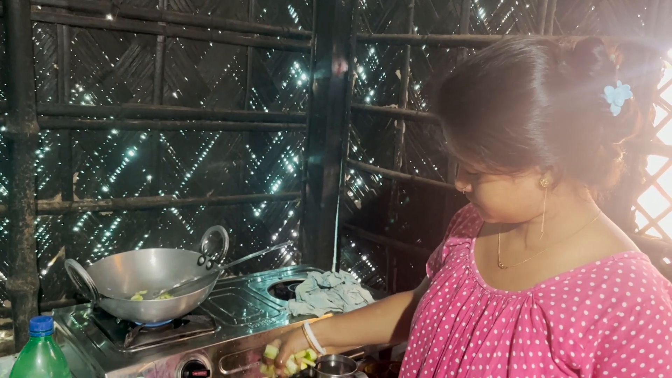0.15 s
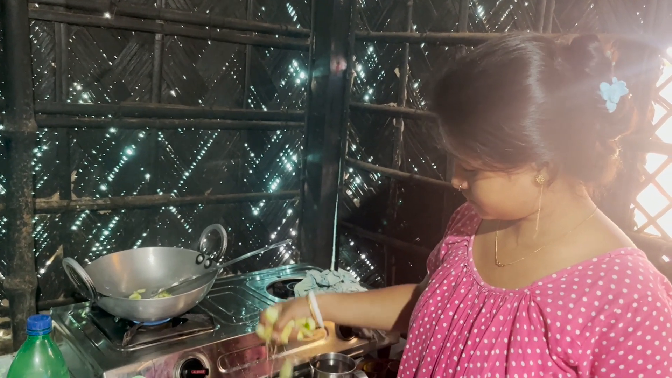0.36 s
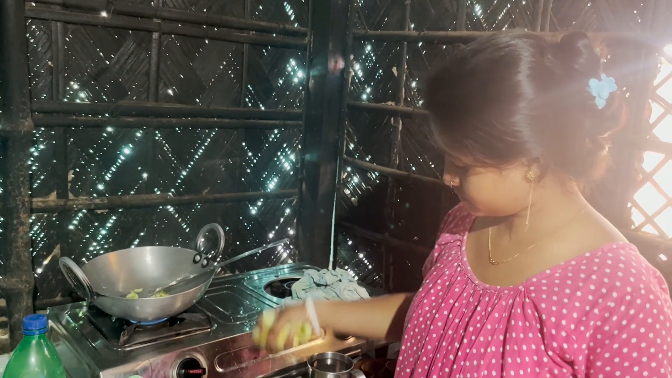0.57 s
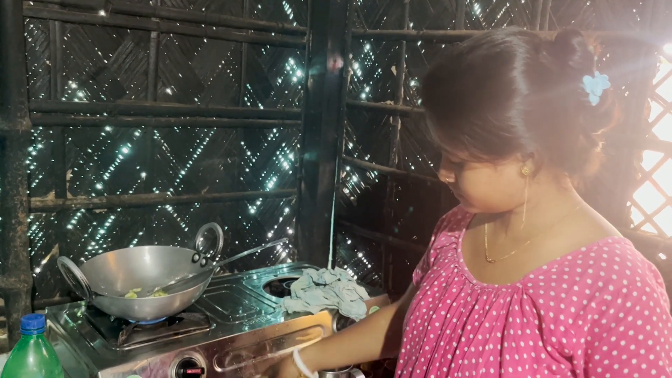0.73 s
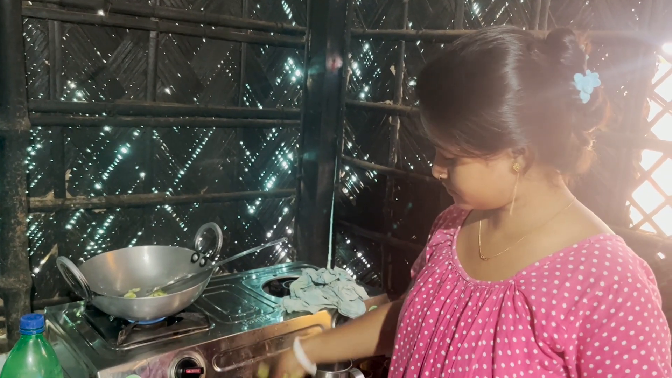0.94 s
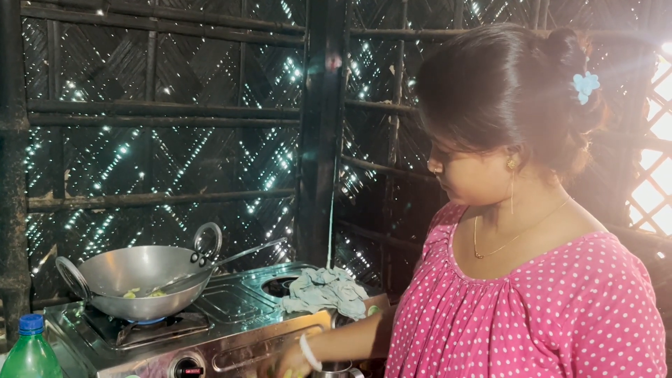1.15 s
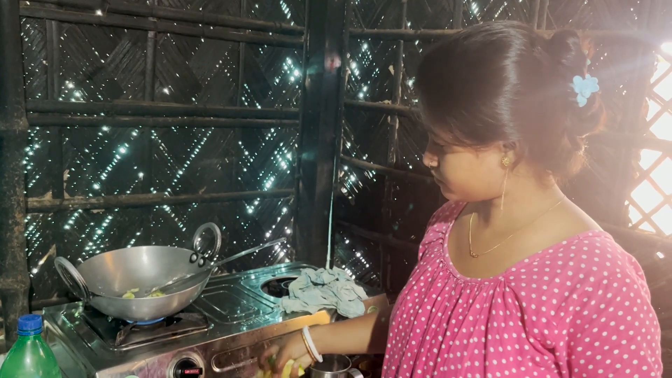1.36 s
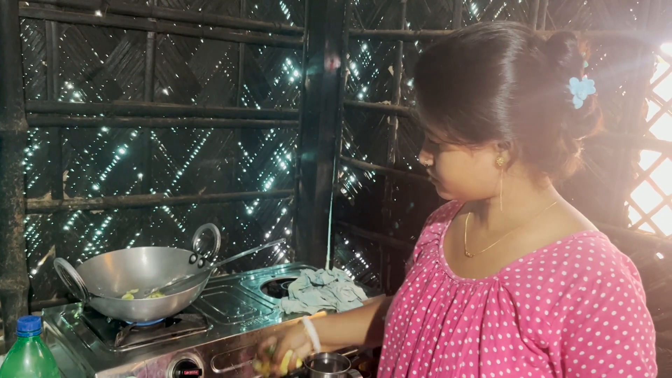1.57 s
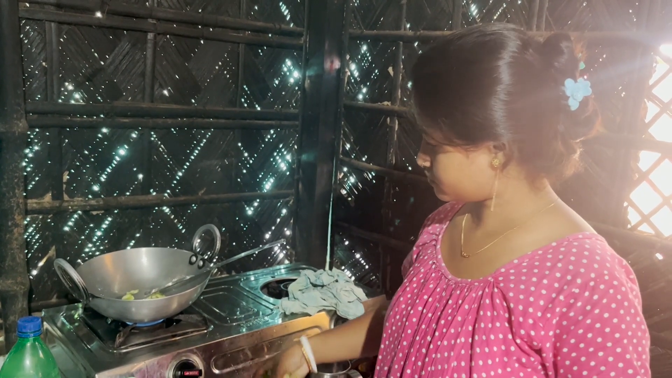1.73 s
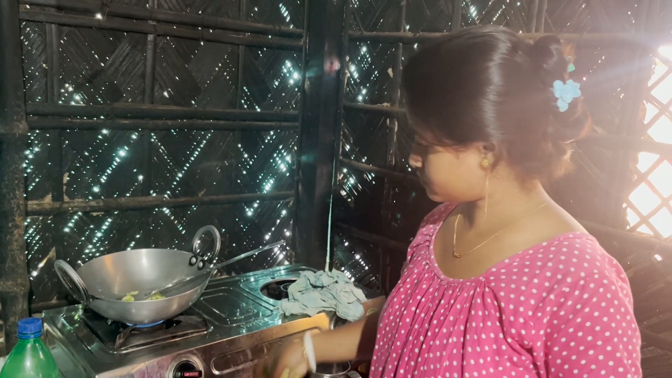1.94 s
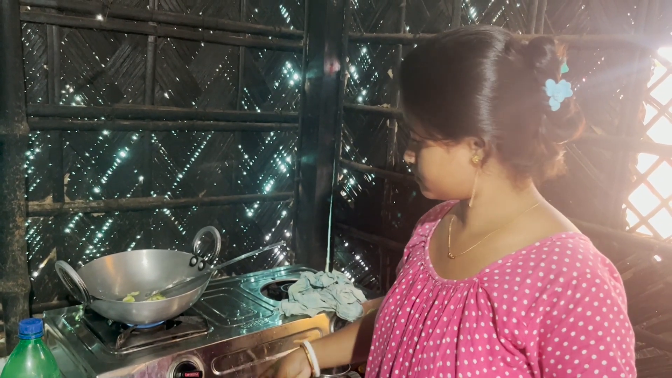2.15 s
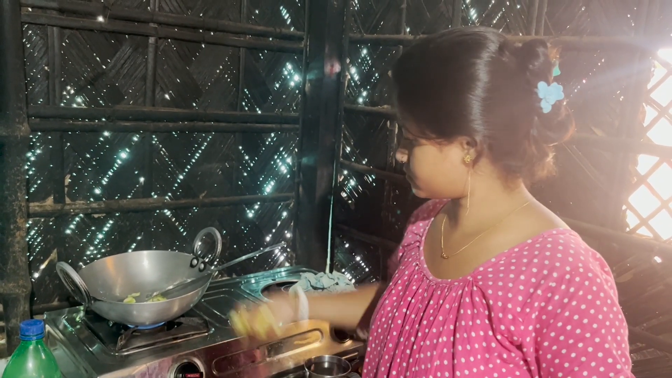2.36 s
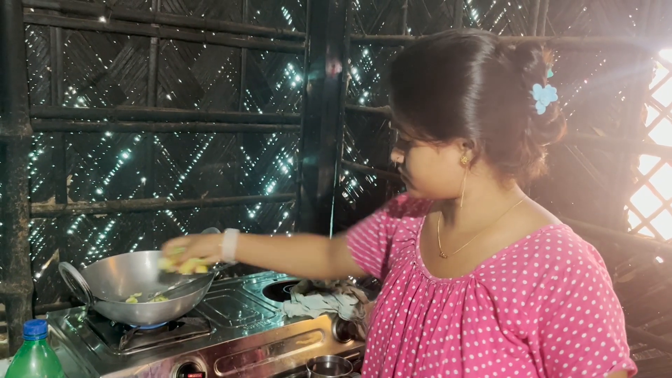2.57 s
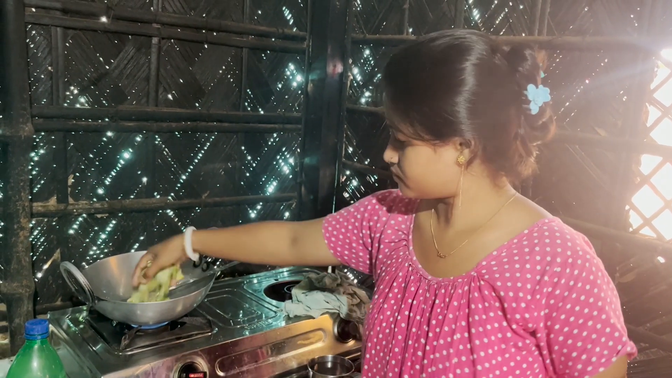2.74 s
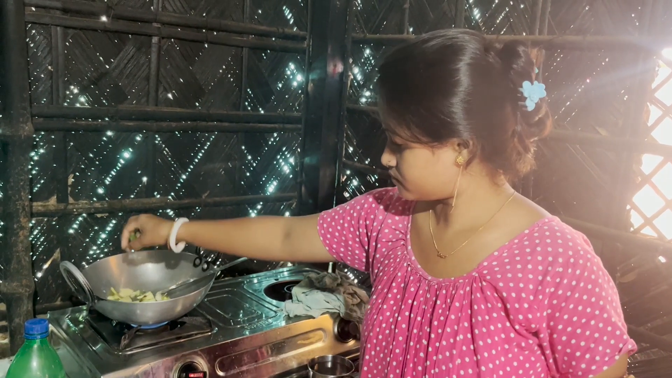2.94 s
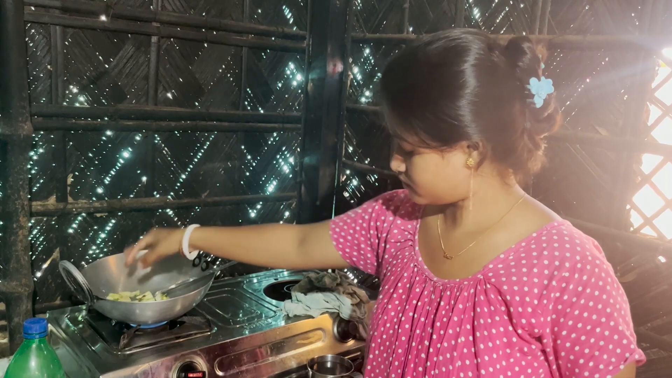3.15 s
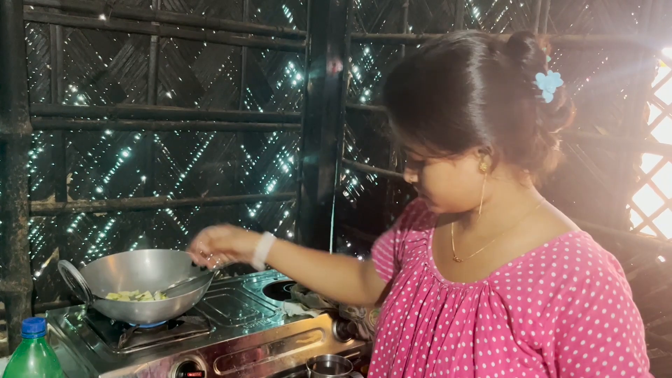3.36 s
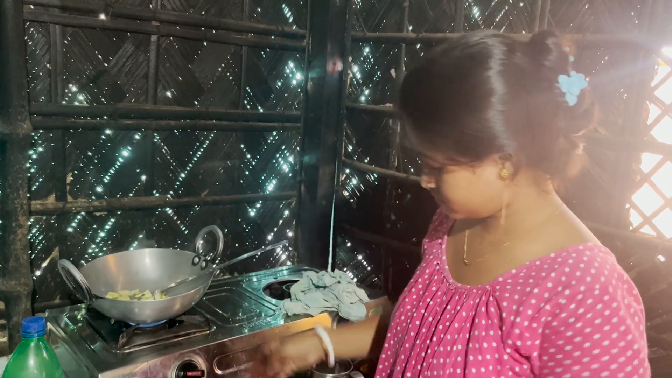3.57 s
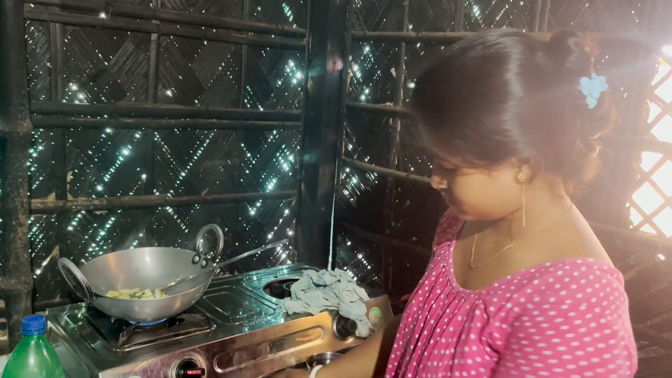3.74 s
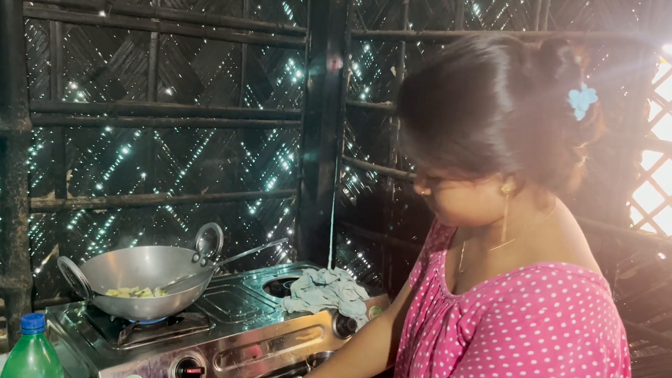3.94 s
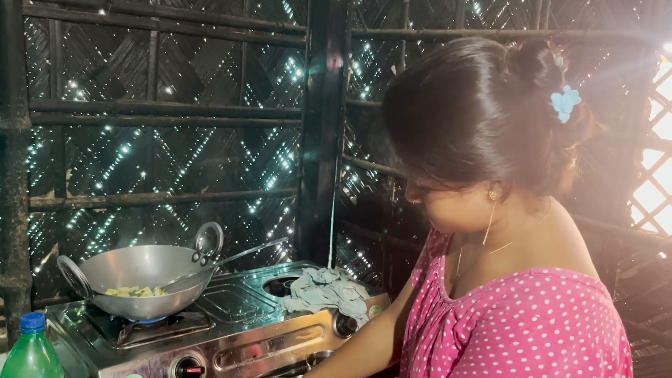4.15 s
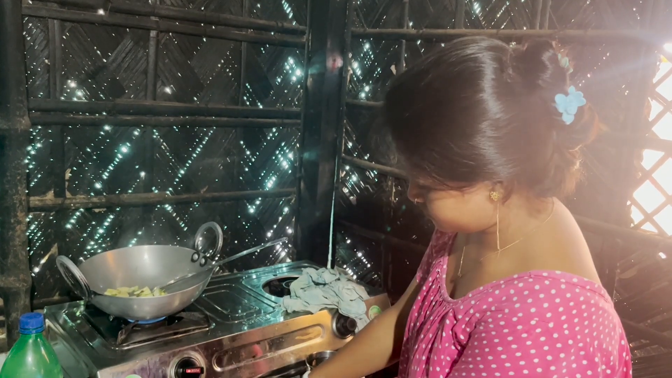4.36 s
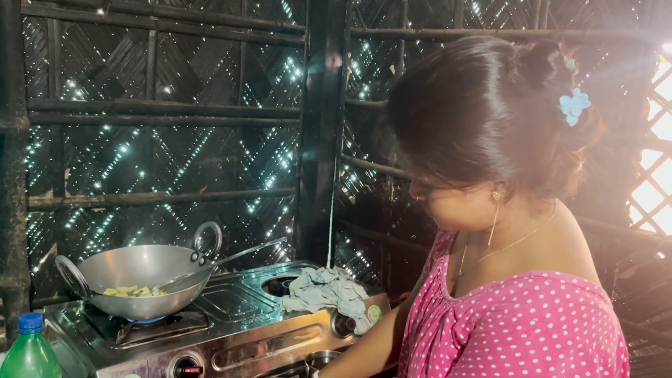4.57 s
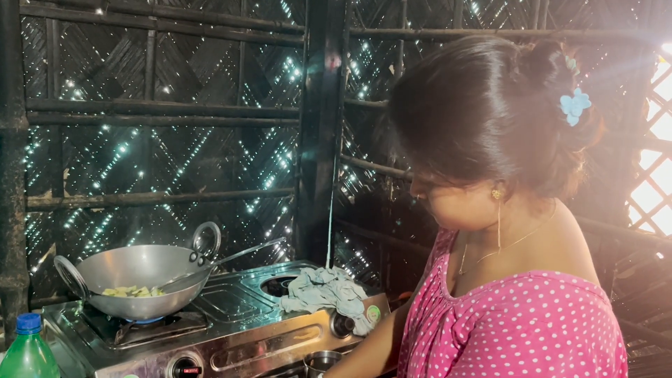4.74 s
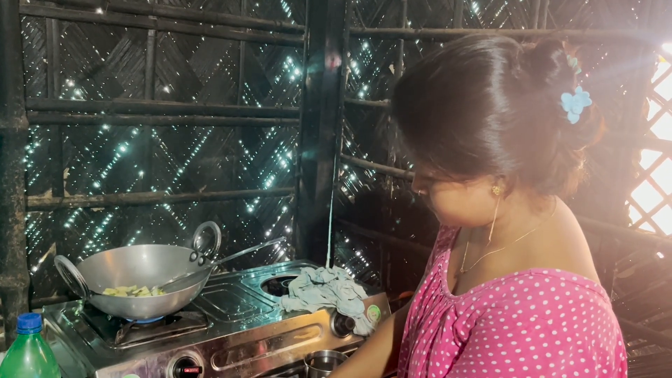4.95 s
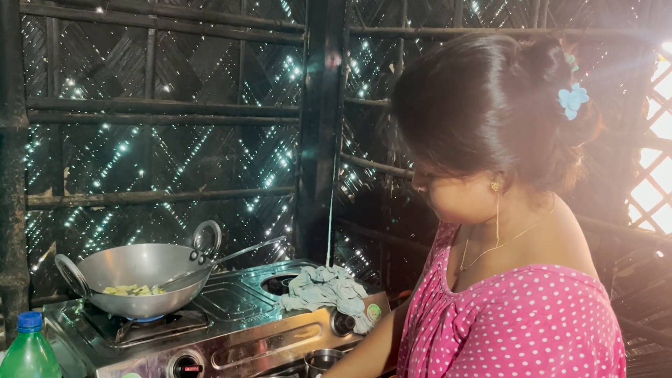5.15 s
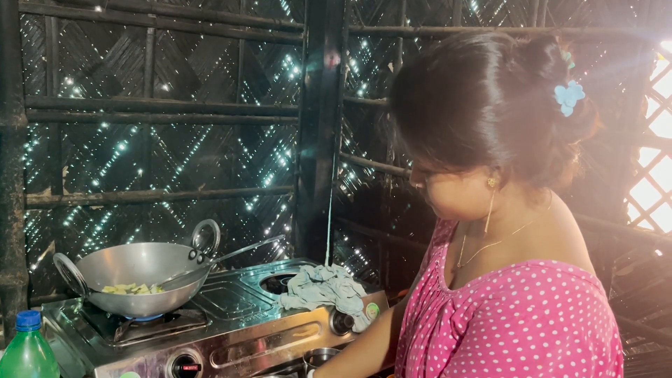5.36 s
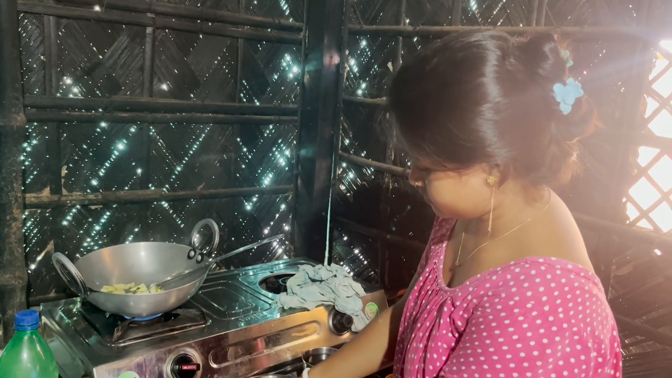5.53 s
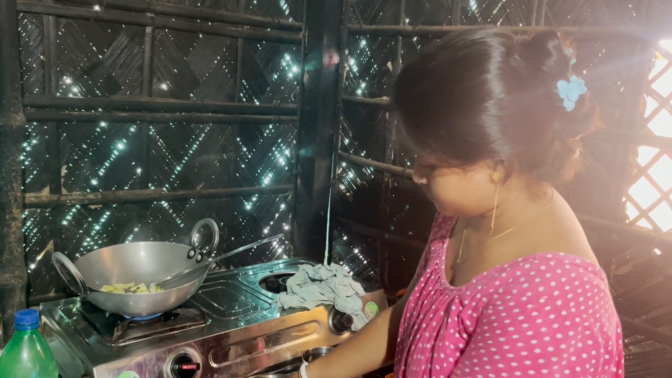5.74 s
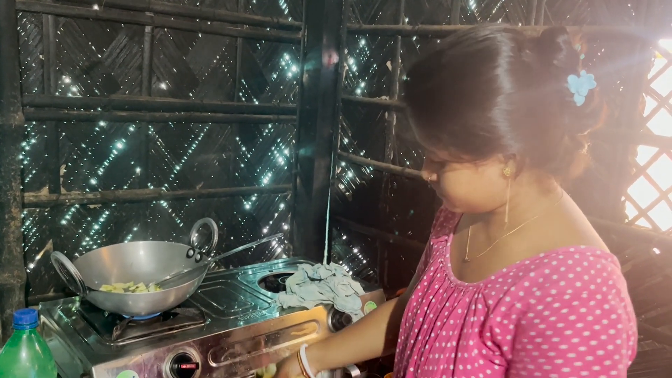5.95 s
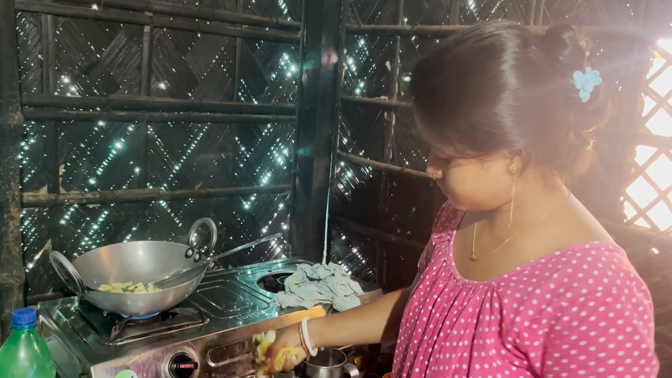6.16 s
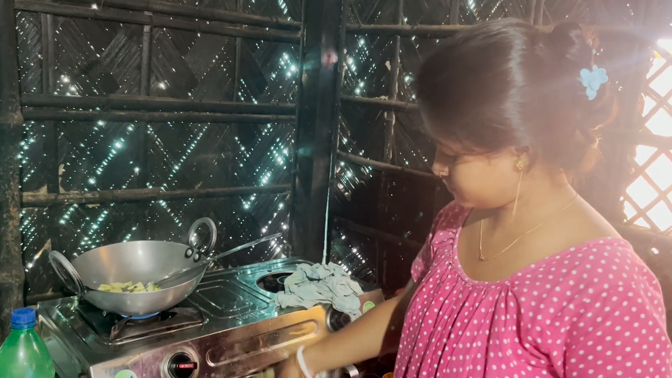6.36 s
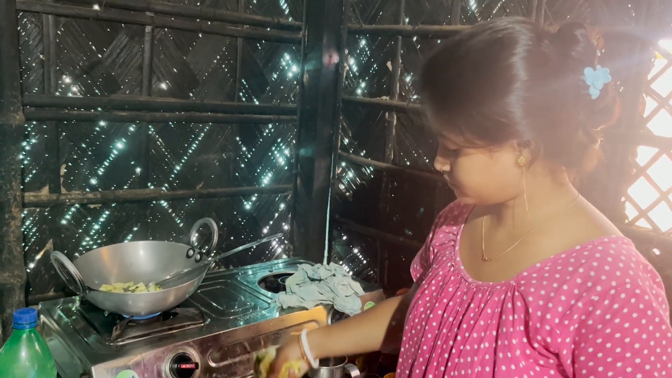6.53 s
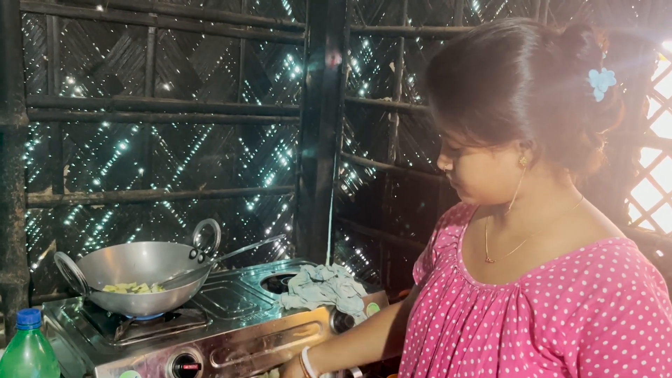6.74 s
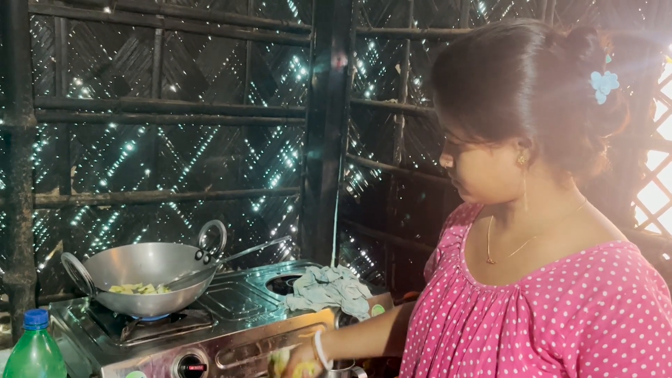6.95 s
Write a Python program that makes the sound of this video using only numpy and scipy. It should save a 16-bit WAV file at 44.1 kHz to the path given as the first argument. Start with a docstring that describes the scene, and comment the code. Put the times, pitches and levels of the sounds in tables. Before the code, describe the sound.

Wet vegetables sizzle and spit in a steel wok over gas; a fresh handful drops in and the frying surges louder.

```python
"""A steel wok sputters on a rumbling gas flame: tiny steam bubbles fizz, larger ones crackle and ring.
Pockets of water flash to steam in short spits from the start; faint far tones and low swells come and go.
At about 2.8 s a wet handful of vegetables drops in and slaps the steel; the sizzle surges, then settles.
From 3.5 s big bubbles well up, and a hard tick follows near 6.6 s. Noise, pops and decaying sines make
the sources; filters and echoes shape them for the two microphone ports of a phone at the side."""
import sys
import numpy as np
from scipy import signal
from scipy.fft import rfft, irfft
from scipy.io import wavfile

SR = 44100
rng = np.random.default_rng(int(sys.argv[2]) if len(sys.argv) > 2 else 0)


def wav_out(sig):
    """Save sig, one row per channel (or a flat mono array), as 16-bit PCM at SR to the path in sys.argv[1]."""
    wavfile.write(sys.argv[1], SR, np.round(np.clip(np.atleast_2d(sig).T, -1, 1) * 32767).astype(np.int16))


N = 313110
TIME = np.arange(N) / SR
FREQ = np.maximum(np.arange(N // 2 + 1) * SR / N, 1)
# time the oil takes to recover from the handful (s, exponential)
RECOVERY_S = 53
# pockets of water flashing to steam, before filtering:
# [t/s, fizz level/dB, crackle level/dB, decay/s]
WATER_SPITS = [(0.058, -13.5, -35, .025), (0.197, -16, -20, .012), (0.310, -28, -21.5, .03),
               (0.349, -12, -24.5, .02), (0.398, -12, -22, .012), (0.517, -13.5, -20, .025),
               (0.811, -13, -33, .014), (0.876, -22, -20, .009), (0.945, -14, -31, .04),
               (1.032, -14, -17, .013), (1.074, -10.5, -27, .022), (1.106, -12, -24, .008),
               (1.267, -26, -22.5, .03), (1.407, -15, -19, .014), (1.426, -15, -21, .012),
               (1.443, -14, -25, .012), (1.516, -13, -22, .025), (1.645, -16, -32, .03),
               (1.746, -13, -27, .035), (1.768, -18, -21, .009), (1.829, -22, -22, .022),
               (1.866, -14, -22, .012), (1.990, -14, -36, .012), (2.020, -15, -20.5, .03),
               (2.196, -28, -24, .02), (2.268, -14, -21, .025), (2.302, -6.5, -25, .014),
               (2.430, -15, -28, .008), (2.469, -23, -20, .012), (2.492, -19, -24.5, .022),
               (2.772, -17, -23, .04), (2.838, -11, -21, .012), (2.986, -9, -20, .012),
               (3.083, -24, -10, .014), (3.119, -20, -13, .018), (3.181, -16, -9.5, .011),
               (3.435, -20, -12, .012), (3.454, -12, -11, .016), (3.562, -13, -6, .009),
               (3.668, -20, -13, .009), (3.738, -12, -16, .02), (3.796, -11, -5.5, .009),
               (3.906, -20, -11.5, .01), (3.945, -20, -14, .009), (4.054, -12, -17, .01),
               (4.103, -22, -12, .011), (4.275, -22, -13, .007), (4.335, -20, -14, .015),
               (4.365, -11, -21, .009), (4.418, -20, -17, .022), (4.560, -22, -10, .014),
               (4.651, -11, -11, .013), (4.703, -7, -16, .01), (4.846, -18, -16, .01),
               (5.019, -22, -13, .016), (5.161, -8.5, -16.5, .02), (5.309, -15, -15, .012),
               (5.404, -12.5, -22, .025), (5.539, -9, -19, .013), (5.631, -13, -10.5, .011),
               (5.697, -18, -15, .01), (5.787, -24, -17, .009), (5.894, -14, -16, .01),
               (6.040, -18, -19, .008), (6.109, -18, -16, .013), (6.155, -16, -15.5, .006),
               (6.217, -7, -10, .012), (6.230, -10, -13.5, .009), (6.278, -20, -11.5, .007),
               (6.337, -11, -13.5, .016), (6.616, -12, -26, .01), (6.752, -14, -33, .04),
               (6.930, -14, -24, .03)]


def undb(db):
    """Convert a level in decibels to an amplitude ratio."""
    return 10 ** (np.asarray(db) / 20)


def unit(x):
    """Normalise to an rms amplitude of 1."""
    return x / np.sqrt(np.mean(x ** 2))


def colour(points):
    """Spectral envelope in dB, interpolated along the logarithm of frequency."""
    hz, db = np.transpose(points)
    return np.interp(np.log(FREQ), np.log(hz), db)


def ring(x, db):
    """Minimum-phase filtering: a folded cepstrum makes the gain causal; white input keeps its power."""
    cepstrum = irfft(np.log(unit(undb(db))), N)
    cepstrum[1:N // 2] *= 2
    cepstrum[N // 2 + 1:] = 0
    return irfft(rfft(x) * np.exp(rfft(cepstrum)), N)


def fade(x, decay_s):
    """First-order relaxation: every impulse becomes an exponential tail of the same area."""
    pole = np.exp(-1 / (decay_s * SR))
    return signal.lfilter([1 - pole], [1, -pole], x)


def burst(start, decay_s, rise_s):
    """Transient envelope: quick exponential rise and slower fall, at most 0.5 s long."""
    out, first = np.zeros(N), int(start * SR)
    age = TIME[:min(N - first, SR // 2)]
    out[first:first + len(age)] = (1 - np.exp(-age / rise_s)) * np.exp(-age / decay_s)
    return out


def fits(rate, decay_s):
    """Shot noise: random flare-ups (per s) that start sharply and die away, near unit rms, peaks rounded."""
    impulses = (rng.random(N) < rate / SR) * rng.random(N)
    flares = fade(impulses, decay_s)
    return 2 * np.tanh(unit(flares - flares.mean()) / 2)


def pops(rate, spread_db):
    """Random impulse train of bursting bubbles (per s): many small clicks, a few large ones; rms 1."""
    size = undb(spread_db * np.minimum(rng.exponential(size=N), 4))
    happens = rng.random(N) < rate / SR
    return unit(happens * size * np.sign(rng.standard_normal(N)))


def kitchen(x, bowl_db, bowl_s, room_db, room_s):
    """Diffuse scattering off bowl, then walls; returns what the ports share and what they do not."""
    bowl_power = undb(bowl_db) ** 2 * fade(x ** 2, bowl_s)
    room_power = undb(room_db) ** 2 * fade(x ** 2, room_s)
    scatter = np.sqrt(bowl_power + room_power) * rng.standard_normal((2, N))
    direct = np.array([x, x * np.sign(rng.standard_normal(N))])
    return (direct + scatter) / np.sqrt(1 + undb(bowl_db) ** 2 + undb(room_db) ** 2)


def corner(pair, echo_db, decay_s):
    """Comb filtering by decaying echoes off stove top and near walls, with the very top absorbed."""
    age = TIME[:SR // 10]
    echoes = rng.standard_normal((2, len(age))) * np.exp(-age / decay_s)
    echo_band = signal.butter(2, [3800, 13000], "band", fs=SR, output="sos")
    echoes = signal.sosfilt(echo_band, echoes)
    echoes *= undb(echo_db) / np.sqrt(np.sum(echoes ** 2) / 2)
    return pair + signal.fftconvolve(pair, echoes, axes=1)[:, :N]


def ports(pair):
    """Partial coherence: shared and unshared sound meet two ports with unlike phase and shading."""
    # [f/Hz, likeness 0-1, left minus right level/dB, phase lead of left/rad]
    port_table = [(100, .94, .2, .05), (600, .75, 2.1, .7), (850, .35, 2.5, .7), (1100, .55, .9, .9),
                  (1300, .25, 1.4, 1.4), (1600, .15, 1.2, 1), (1750, .92, .3, .2), (2300, .92, .4, .1),
                  (2800, .55, 3.6, 1.2), (4000, .28, 5.3, .6), (4900, .5, 4, 0), (5500, .53, 3.3, -1),
                  (7000, .72, .6, -1.65), (7900, .98, 0, -2.95), (8250, 1, 0, -3.14), (8700, .98, 0, -3.25),
                  (9100, .85, -.3, -3.85), (10900, .86, -.3, -5.65), (11400, .99, 0, -6.2),
                  (12300, .99, 0, -6.3), (13100, .76, 0, -7.1), (14500, .78, 0, -8.7),
                  (15200, .99, 0, -9.4)]
    hz, *columns = np.transpose(port_table)
    likeness, pan_db, phase = (np.interp(FREQ, hz, c) for c in columns)
    likeness = np.clip(likeness, 0, 1)
    shared, apart = rfft(pair) * np.sqrt([(1 + likeness) / 2, (1 - likeness) / 2])
    left = (shared + apart) * undb(pan_db / 2) * np.exp(1j * phase)
    right = (shared - apart) * undb(-pan_db / 2)
    return irfft(np.array([left, right]), N)


def far_tones(edge_s, waver, flutter_db):
    """Frequency and amplitude modulation: soft sines drift in from outside, unsteady in pitch and strength."""
    # faint tones, before flutter and the ports: [start t/s, end t/s, f/Hz, level/dB]
    distant_tones = [(.86, .98, 745, -48), (.92, 1.29, 700, -46.5), (2.18, 2.5, 745, -45.5)]
    out = np.zeros((2, N))
    for start, end, hz, db in distant_tones:
        swell = np.clip(np.minimum(TIME - start, end - TIME) / edge_s, 0, 1)
        wavering_hz = hz * (1 + waver * fits(rate=34.3, decay_s=0.053))
        phase = 2 * np.pi * np.cumsum(wavering_hz) / SR
        level = undb(db + flutter_db * fits(rate=48, decay_s=.04))
        out[0] += level * np.sqrt(2) * swell * np.sin(phase)
    return out


def low_swells(half_s, width_hz):
    """Narrow-band noise: the low rumble booms up briefly, each time round one pitch."""
    # brief swells: [t/s, f/Hz, level/dB]
    swell_table = [(.59, 75.5, -36), (2.1, 95, -36), (4.15, 110, -38), (5.35, 114, -41)]
    out, noise = 0, rfft(rng.standard_normal(N))
    for s, hz, db in swell_table:
        boom = unit(irfft(noise / (1 + (2 * (FREQ - hz) / width_hz) ** 4), N))
        out = out + undb(db) * np.exp(-((TIME - s) / half_s) ** 2) * boom
    return out


def flame(rumble_db):
    """Turbulent combustion noise: a low rumble in the hollow under the wok sways with the draught."""
    # spectrum of the rumble: [f/Hz, relative level/dB]
    flame_spectrum = [(15, -59), (25, -21), (55, -4), (80, 0), (90, -2.5), (101, 3.5), (130, -12),
                      (290, -11.5), (450, -22), (1200, -19), (5000, -79)]
    # sway of the flame, to which rumble_db is added: [t/s, level/dB]
    sway = [(0, -44), (0.5, -41.5), (1.4, -42), (2.1, -42), (2.6, -44), (3.5, -43.5), (4.15, -44),
            (4.5, -44), (5.6, -44.5), (6.55, -43.5), (6.75, -41), (7.1, -44)]
    draught_db = np.interp(TIME, *np.transpose(sway))
    rumble = unit(ring(rng.standard_normal((2, N)), colour(flame_spectrum)))
    return undb(rumble_db + draught_db) * rumble


def tick(s, db, decay_s, low_hz):
    """Impulsive contact noise: something small and hard clicks near the cook's hand, unlike at each port."""
    high_pass = signal.butter(2, low_hz, "high", fs=SR, output="sos")
    bright = signal.sosfilt(high_pass, rng.standard_normal((2, N)))
    return undb(db) * burst(s, decay_s, rise_s=.0002) * bright


def vegetables(thump_hz, thump_width_hz):
    """Impact excitation: soft pieces slap the steel and bump the wok on its resonant stand."""
    # pieces landing, before the envelope: [t/s, slap level/dB, thump level/dB, decay/s]
    impacts = [(2.768, -23, -43, .04), (2.797, -22, -45, .03), (2.822, -30, -26, .025),
               (2.836, -21, -31, .022)]
    # spectrum of the slap: [f/Hz, relative level/dB]
    slap_spectrum = [(60, -19), (200, -19.5), (450, -20), (700, -11.5), (950, -8.5), (1300, -19),
                     (3000, -13), (9000, -30)]
    slap = sum(undb(db) * burst(s, decay_s, rise_s=0.008) for s, db, _, decay_s in impacts)
    thump = sum(undb(db) * burst(s, decay_s, rise_s=0.0041) for s, _, db, decay_s in impacts)
    stand_db = -20 * np.log10(1 + (2 * (FREQ - thump_hz) / thump_width_hz) ** 2)
    slap_sound = ring(slap * rng.standard_normal((2, N)), colour(slap_spectrum))
    return slap_sound + ring(thump * rng.standard_normal((2, N)), stand_db)


def surge(decay_s):
    """Saturation and decay: the boiling share of the handful grows, holds, then dies away."""
    # touches the oil, spreads through it, boils at full strength
    drop_s, spread_s, hold_s = 2.535, 0.73, .27
    spread = np.clip((TIME - drop_s) / spread_s, 0, 1)
    drying_s = np.maximum(TIME - drop_s - spread_s - hold_s, 0)
    return spread * np.exp(-drying_s / decay_s)


def boil(first_db, drying_db_per_s, surface_db, surface_s, juice_db, juice_s, share=1):
    """Power addition of three water stores in dB: earlier pieces, the handful's wet skin, its slow juice."""
    first = undb(first_db - drying_db_per_s * TIME)
    surface = undb(surface_db) * surge(surface_s)
    juice = undb(juice_db) * surge(juice_s)
    return 10 * np.log10(first ** 2 + share * (surface ** 2 + juice ** 2))


def lulls():
    """Amplitude modulation: a Gaussian dip in dB wherever the boiling slackens."""
    # centres of the dips: [t/s, depth/dB]
    slackenings = [(.57, 2), (2.38, 2), (2.66, 2), (4.25, 3), (4.40, 2), (5.21, 2), (6.41, 3)]
    half_s = .016
    return -sum(db * np.exp(-((TIME - s) / half_s) ** 2) for s, db in slackenings)


def steam(level_db, rate, spread_db):
    """Modulated shot noise: a bed of steam pops at the given level."""
    return undb(level_db) * pops(rate, spread_db)


def spray(jets, crack_db):
    """Flash boiling: each jet (t/s, level/dB, decay/s) opens with a crack and dies in a dense spray of pops."""
    power, cracks = np.zeros(N), np.zeros(N)
    for s, db, decay_s in jets:
        power += (undb(db) * burst(s, decay_s, rise_s=0.0002)) ** 2
        cracks[int(s * SR)] += undb(db + crack_db) * np.sign(rng.standard_normal())
    return pops(rate=9000, spread_db=1.5) * np.sqrt(power) + cracks


def bubbles(pitch_hz, cycles, spread_octaves, spread_db, glide, count):
    """Damped bubble resonance: each rings for some cycles, rising in pitch towards the surface; rms 1."""
    when, tune, size, life = rng.random((count, 4)).T
    first = (when * N).astype(int)
    hz = np.minimum(pitch_hz * 2 ** (spread_octaves * (2 * tune - 1)), SR / 3)
    age = TIME[:int(6 * SR * cycles / pitch_hz)]
    # age of each bubble in its own decay times
    lives = age * (hz / (cycles * (.5 + life)))[:, None]
    rise = 1 + glide * (1 - np.exp(-lives))
    wave = np.exp(-lives) * np.cos(2 * np.pi * hz[:, None] * age * rise)
    wave *= undb(spread_db * np.minimum(-np.log(1 - size), 4))[:, None]
    places = first[:, None] + np.arange(len(age))
    return unit(np.bincount(places.ravel(), wave.ravel(), N)[:N])


def bubbling(fizz_level, lull_db):
    """Size sets pitch: tiny and small bubbles follow the fizz level, big ones well up later, all in clusters."""
    tiny = bubbles(11370, cycles=60, spread_octaves=.3, spread_db=2.8, glide=.005, count=1800)
    small = bubbles(5420, cycles=18, spread_octaves=.36, spread_db=2.6, glide=.015, count=2000)
    big = bubbles(2286, cycles=6, spread_octaves=.24, spread_db=2, glide=.04, count=750)
    # big bubbles well up once the pieces have sunk in, then thin out
    start_s, rise_s, decay_s = 3.5, 0.29, 1.23
    age = np.maximum(TIME - start_s, 0)
    welling = np.minimum(age / rise_s, 1) * np.exp(-np.maximum(age - rise_s, 0) / decay_s)
    # tiny and small levels are relative to the fizz
    sizes = (undb(fizz_level - 13) * tiny,
             undb(fizz_level - 14.5) * small,
             undb(-27.5 + lull_db) * welling * big)
    return sum(undb(1.5 * fits(rate=80, decay_s=.015)) * size for size in sizes)


def cooled(fizz):
    """Thermal inertia: oil cooled by the handful makes less of the finest fizz and reheats slowly."""
    fine_fizz_hz, cooling_db = 8100, 4
    high_pass = signal.butter(2, fine_fizz_hz, "high", fs=SR, output="sos")
    finest = signal.sosfiltfilt(high_pass, fizz)
    return fizz - finest * (1 - undb(-cooling_db * surge(RECOVERY_S)))


def fizzing(level_db, rate, snap_db):
    """Superposed impulses: a fine steam bed, the hiss of spits and the snap of single droplets."""
    # droplets that snap, to which snap_db is added: [t/s, level/dB]
    droplets = [(.181, -4), (.621, -1), (.718, -8), (1.168, -3), (1.292, -7), (1.875, -12), (2.036, -9),
                (5.634, -10), (6.617, -2)]
    fizz = steam(level_db, rate, spread_db=2.6)
    fizz += spray([(s, db, decay_s) for s, db, _, decay_s in WATER_SPITS], crack_db=12)
    for s, db in droplets:
        fizz[int(s * SR)] += undb(db + snap_db)
    return fizz


def crackling(level_db, rate):
    """Superposed impulses: a bed of larger pops, and spits thinned because they leave the oil."""
    crackle = steam(level_db, rate, spread_db=3.6)
    wet_spits = spray([(s, db, decay_s) for s, _, db, decay_s in WATER_SPITS], crack_db=14)
    high_pass = signal.butter(1, 330, "high", fs=SR, output="sos")
    return crackle + signal.sosfilt(high_pass, wet_spits)


def wok_resonance():
    """Modal response: resonances and hollows of wok and stove top lift or cut the spectrum (dB)."""
    # [f/Hz, least width/Hz, lift/dB]
    modes = [(381, 22, 6.5), (497, 92, 7), (603, 70, 12), (690, 25, 4), (776, 51, 8), (850, 45, 10),
             (960, 45, 9), (1086, 32, 7), (1280, 55, 8), (1350, 40, 4), (1395, 35, -5), (1480, 110, 3),
             (1562, 40, -5), (1711, 50, 5), (1896, 100, 4.5), (1965, 40, -6), (2055, 55, 4.5),
             (2100, 30, -4), (2160, 60, 4.5), (2700, 50, 4), (2815, 60, 2.5), (2965, 45, -3),
             (3095, 70, 3.5), (3370, 120, 3), (3490, 55, -5), (3540, 50, 3), (4610, 110, 2), (4770, 70, 1),
             (4880, 120, -2), (5970, 100, 1.5)]
    top_q = 60  # the oil damps the steel, so no resonance is sharper
    return sum(db / (1 + (2 * (FREQ - hz) / max(width, hz / top_q)) ** 2) for hz, width, db in modes)


def sizzle(snap_db, crackle_sputter):
    """Source and filter: fizz and crackle sputter together, bubbles ring in own clusters; the wok colours all."""
    # spectra of fizz and crackle, before the wok's resonances: [f/Hz, relative level/dB]
    fizz_spectrum = [(200, -35.5), (1500, -25.5), (2800, -6), (4000, -5.5), (5000, -1.4), (6000, 0.2),
                     (6900, -.3), (7500, 1.2), (8200, 0), (9000, 2), (10500, 1.5), (12500, -.4),
                     (15500, -1.8)]
    crackle_spectrum = [(40, -55), (150, -10), (330, -17), (500, -13.5), (800, -12.5), (1100, -8),
                        (1500, -1.5), (2200, -0.5), (3000, -1), (4200, -4.5), (7000, -12), (15000, -9.5)]
    fizz_level = boil(first_db=-13.0, drying_db_per_s=1.67, surface_db=-10.5, surface_s=0.33,
                      juice_db=-12.5, juice_s=14.3)
    # the new pieces hiss at once but only crackle once they have sunk into the oil
    soak_s, soak_rise_s = 2.85, 0.18
    soaked = np.clip((TIME - soak_s) / soak_rise_s, 0, 1)
    crackle_level = boil(first_db=-26.5, drying_db_per_s=0.54, surface_db=-23.0, surface_s=0.88,
                         juice_db=-21.0, juice_s=6.5, share=soaked)
    # a few pieces sputter unevenly (dB); the added handful smooths this out (share)
    depth_db = 1.26 * (1 - 0.15 * surge(RECOVERY_S))
    sputter = depth_db * fits(rate=60, decay_s=.022)
    # the fizz follows the crackle only halfway into each lull
    lull_db = lulls()
    fizz_level = fizz_level + .5 * lull_db
    crackle_level = crackle_level + lull_db
    # more water on the oil makes more bubbles
    activity = undb(crackle_level - np.mean(crackle_level))
    fizz = fizzing(fizz_level + sputter, 5000 * activity, snap_db)
    # the crackle follows the sputter and also comes in quick clusters of its own
    clusters = 0.87 * fits(rate=150, decay_s=0.013)
    crackle = crackling(crackle_level + crackle_sputter * sputter + clusters, 1400 * activity)
    wok_db = wok_resonance()
    ringing = ring(bubbling(fizz_level, lull_db), wok_db)
    fizz = kitchen(fizz, bowl_db=-4, bowl_s=.003, room_db=-12, room_s=.01)
    fizz = ring(fizz, colour(fizz_spectrum) + wok_db)
    crackle = kitchen(crackle, bowl_db=-4, bowl_s=.004, room_db=-10, room_s=.024)
    crackle = ring(crackle, colour(crackle_spectrum) + wok_db)
    # the bubbles' sound also glances off the far side of the bowl, 3.7 ms later
    glancing = np.array([ringing, np.interp(TIME - .0037, TIME, ringing)])
    return corner(cooled(fizz) + crackle + glancing, echo_db=-18, decay_s=.03)


def scene():
    """Linear superposition of everything at the stove, heard at the two ports."""
    frying = sizzle(snap_db=9, crackle_sputter=.8)
    landing = vegetables(thump_hz=80, thump_width_hz=36)
    tones = far_tones(edge_s=0.03, waver=0.0028, flutter_db=1.5)
    stove = ports(frying + landing + flame(rumble_db=2.5) + tones)
    stove += low_swells(half_s=0.07, width_hz=29)
    return stove + tick(s=6.640, db=-4, decay_s=.009, low_hz=3500)


def record(dry):
    """Peak clipping and steep low-pass filtering: the phone limits the sharpest pops and cuts the top."""
    top_hz = 15700
    low_pass = signal.ellip(12, .1, 70, top_hz, fs=SR, output="sos")
    return signal.sosfilt(low_pass, np.clip(dry, -1.1, 1.1))


dry = scene()
out = record(dry)
wav_out(out)
```